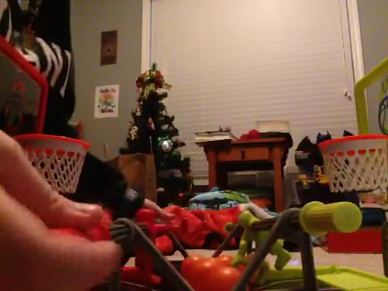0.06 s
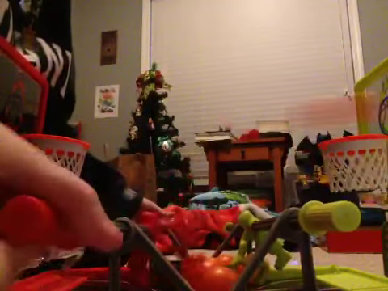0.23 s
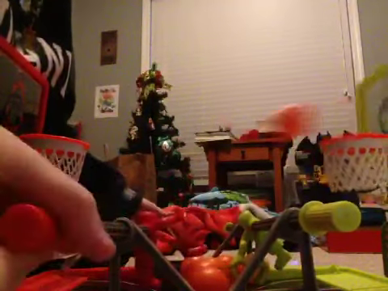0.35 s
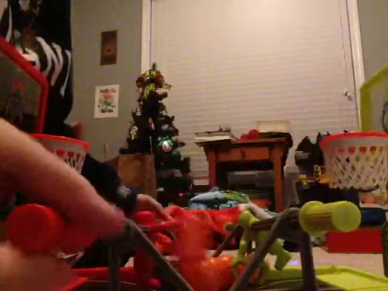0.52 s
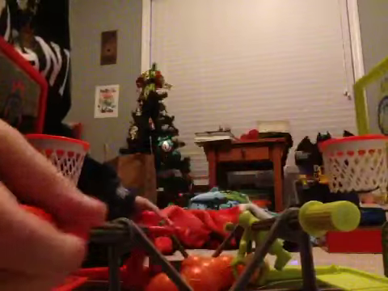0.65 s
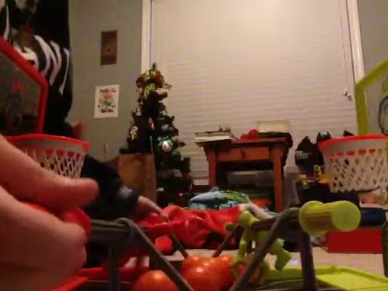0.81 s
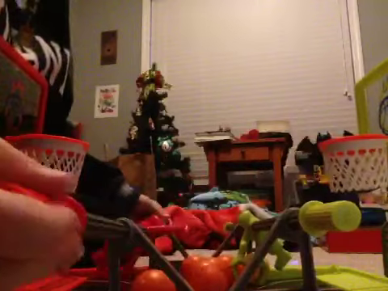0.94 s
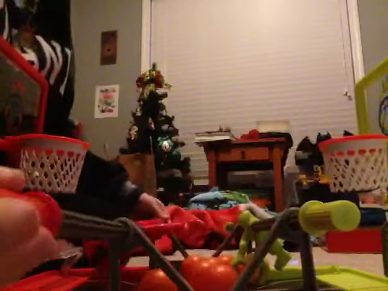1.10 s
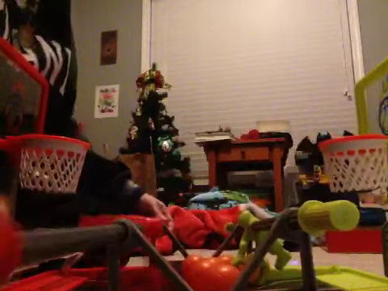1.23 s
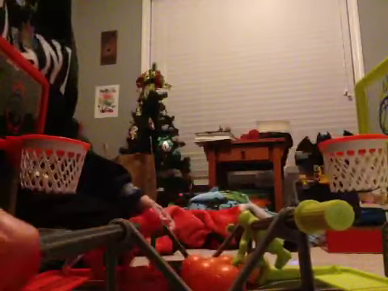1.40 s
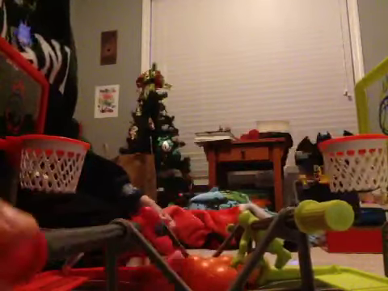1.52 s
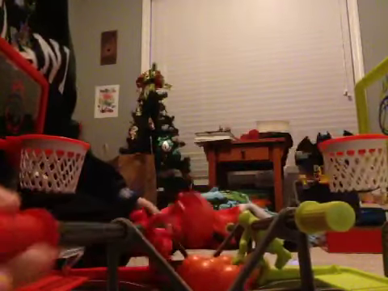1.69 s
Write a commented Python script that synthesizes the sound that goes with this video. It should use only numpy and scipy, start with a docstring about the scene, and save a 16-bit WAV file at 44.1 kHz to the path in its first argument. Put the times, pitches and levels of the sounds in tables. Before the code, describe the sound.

Plastic levers and rods of a tabletop game clack and knock in a quiet room.

```python
"""A quiet living room, with a plastic tabletop basketball game played close by.
Levers click and ping; a rod twice slams against its stop, ringing the frame; the hardest blows jolt the
microphone with a low thump. A small hollow ball bounces with a shell tick and a body tock. Between blows
the rod scrapes and a hand bumps the frame. Ceiling and walls answer every clack, over a faint hush."""
import sys
import numpy as np
from scipy import signal
from scipy.fft import rfft, irfft
from scipy.io import wavfile

SR = 44100
rng = np.random.default_rng(int(sys.argv[2]) if len(sys.argv) > 2 else 0)


def waveform_to_disk(signal):
    """Save audio, clipped to [-1, 1], as 16-bit WAV at the path in sys.argv[1]."""
    frames = np.transpose(np.atleast_2d(signal))
    scaled = np.clip(frames, -1, 1) * 32767
    samples = np.round(scaled).astype(np.int16)
    wavfile.write(sys.argv[1], SR, samples)


N = 77175
T = np.arange(N) / SR


def amp(db):
    """Decibels to gain."""
    return 10 ** (np.asarray(db) / 20)


def unit(x):
    """Scale to unit energy."""
    return x / np.sqrt(np.sum(x ** 2) + 1e-30)


def lookup(hz, points, column=1):
    """Interpolate a table column along log frequency."""
    table = np.array(points, float)
    return np.interp(np.log(np.maximum(hz, 1)), np.log(table[:, 0]), table[:, column])


def colour(x, points, size=4096):
    """Minimum-phase filter through (frequency [Hz], gain [dB]) points."""
    cepstrum = irfft(np.log(amp(lookup(np.fft.rfftfreq(size, 1 / SR), points))))
    cepstrum[1:size // 2] *= 2
    cepstrum[size // 2 + 1:] = 0
    return signal.fftconvolve(x, irfft(np.exp(rfft(cepstrum))))[:len(x)]


def shaped(noise, eq):
    """Coloured noise at unit RMS."""
    return unit(colour(noise, eq)) * np.sqrt(N)


def contour(points):
    """Gain curve through (time [s], level [dB]) points."""
    return amp(np.interp(T, *np.array(points).T))


def fade(t60_s, size):
    """Exponential decay."""
    return np.exp(-np.log(1000) * T[:size] / max(t60_s, 1e-3))


def dense_modes(envelope, size):
    """Countless close modes as flat-spectrum noise, each band under envelope(centre_hz)."""
    edges_hz = np.r_[20, 140, 280, 450, 700, 1000, np.geomspace(1400, 17000, 13)]
    spectrum, hz = rfft(rng.standard_normal(size)), np.fft.rfftfreq(size, 1 / SR)
    out = 0
    for lo, hi in zip(edges_hz[:-1], edges_hz[1:]):
        band = irfft(spectrum * (hz >= lo) * (hz < hi), size)
        out += unit(band * envelope(np.sqrt(lo * hi))) * np.sqrt(2 * (hi - lo) / SR)
    return out


def contact(t60_s, size=8192):
    """A hit on plastic: a snap, then a dense ring; t60_s holds at 5 kHz, lower bands ring longer."""
    snap_db, snap_s, bass_exponent = -17, 0.0012, 0.22
    snap = 2 * amp(snap_db) * np.exp(-T[:size] / snap_s)
    return dense_modes(lambda hz: fade(t60_s * (5000 / hz) ** bass_exponent, size) + snap, size)


def ring(modes, size=8192):
    """Struck modes of alternating sign: (frequency [Hz], resonance peak [dB], t60 [s])."""
    out = 0
    for k, (hz, db, t60_s) in enumerate(modes):
        decay = fade(t60_s, size)
        out += (-1) ** k * 2 * amp(db) * decay / decay.sum() * np.cos(2 * np.pi * hz * T[:size])
    return out


def add(bus, time_s, x, send_db=0):
    """Mix x into a bus: row 0 direct, row 1 room send."""
    start = int(time_s * SR)
    bus[:, start:start + len(x)] += np.outer([1, amp(send_db)], x[:N - start])


# Background spectrum (frequency [Hz], gain [dB])
HUSH_EQ = [(18, -64), (30, -28), (85, -47), (123, -11), (173, -16.5), (213, -5), (359, -13.5), (591, -25.5),
           (970, -27), (1140, -27.5), (1290, -33), (1440, -33), (15500, -30)]


def hush(rms_db=-63.5):
    """Faint steady room noise."""
    return shaped(rng.standard_normal(N), HUSH_EQ) * amp(rms_db)


# Diffuse tail (frequency [Hz], gain [dB], t60 [s])
ROOM_TAIL = [(116.3, -7.5, 0.58), (260, -8.5, 0.26), (715, -12.5, 0.34), (1550, -5.5, 0.22),
             (3970, -4.5, 0.29), (9200, -6, 0.3), (13300, -4.5, 0.17)]
# First reflections (delay [s], level [dB])
REFLECTIONS = [(.0157, -8.5), (.0240, -14), (.029, -12)]
# Reflection spectrum (frequency [Hz], gain [dB])
REFLECTION_EQ = [(300, -7), (2000, -4), (7000, -1.5)]


def room(send, size=24000):
    """Bright ceiling and wall reflections, scattered by furniture, and a short diffuse tail."""
    delay_s, build_s, scatter_t60_s = 0.0038, 0.0074, 0.0062
    build = 1 - np.exp(-np.maximum(T[:size] - delay_s, 0) / build_s)
    tail = dense_modes(lambda hz: build * fade(lookup(hz, ROOM_TAIL, column=2), size), size)
    response = colour(tail, ROOM_TAIL)
    for time_s, db in REFLECTIONS:
        scatter = dense_modes(lambda hz: fade(scatter_t60_s, 2048), 2048)
        start = int(time_s * SR)
        response[start:start + len(scatter)] += amp(db) * colour(scatter, REFLECTION_EQ)
    return signal.fftconvolve(send, response)[:N]


# Rod sliding in its bearing (time [s], level [dB])
SLIDE_LEVEL = [(.93, -84), (.97, -67.5), (1.1, -67), (1.16, -82)]
# Slide spectrum (frequency [Hz], gain [dB])
SLIDE_EQ = [(500, -26), (1400, -6.5), (1900, -2), (2550, -2), (3300, -10), (8000, -18)]


def rod_slide():
    """A faint, grainy rub as the rod is drawn back."""
    grain = rng.standard_normal(N) * amp(np.minimum(3 * rng.exponential(size=N), 20))
    return shaped(grain, SLIDE_EQ) * contour(SLIDE_LEVEL)


# Rod friction (time [s], level [dB])
SCRAPE_LEVEL = [(0, -76), (.17, -74.5), (.205, -58.5), (.243, -45), (.262, -41), (.29, -53), (.85, -65),
                (.98, -67.5), (1.11, -66), (1.21, -69.5), (1.275, -54.5), (1.33, -59), (1.58, -72.5),
                (1.62, -66), (1.75, -66)]
# Scrape spectrum (frequency [Hz], gain [dB])
SCRAPE_EQ = [(60, -12), (200, 5.5), (550, 3.5), (1200, -1), (2500, -6), (4500, -13), (15000, -18.5)]


def rod_scrape():
    """The rod scrapes in tiny catches."""
    bus = np.zeros((2, N))
    catches = rng.standard_normal(N) * amp(5.4 * rng.exponential(size=N))
    add(bus, 0, shaped(np.clip(catches, -40, 40), SCRAPE_EQ) * contour(SCRAPE_LEVEL))
    return bus


# Hand on the frame (time [s], level [dB])
HAND_BUMPS = [(0.887, -11.5), (.905, -20), (0.964, -13.5), (1.028, -27.5), (1.593, -31), (1.61, -24)]
# Bump spectrum (frequency [Hz], gain [dB])
BUMP_EQ = [(50, -28.5), (110, -10.5), (170, 15.5), (260, 1), (450, 2.5), (800, -30), (3000, -35)]


def hand_bumps():
    """A soft hand draws a low, dull ring from the frame."""
    bus = np.zeros((2, N))
    for time_s, db in HAND_BUMPS:
        add(bus, time_s, amp(db) * colour(contact(t60_s=0.14), BUMP_EQ))
    return bus


# Jolts to the microphone (time [s], level [dB])
LOW_THUMPS = [(0.3236, 9.5), (0.6444, -3), (0.7115, -10)]
# Thump spectrum (frequency [Hz], gain [dB])
THUMP_EQ = [(25, -7), (70, -7), (110, -1.5), (180, 0.5), (260, 13.5), (500, -10.5), (1200, -16.5)]


def low_thumps():
    """The hardest blows jolt the microphone, one low pulse each; no room send."""
    bus = np.zeros((2, N))
    pulse = colour(signal.unit_impulse(4096), THUMP_EQ)
    for time_s, db in LOW_THUMPS:
        add(bus, time_s, amp(db) * pulse)
    return bus[0]


# Ball landings (time [s], level [dB], treble [dB], hollow-body pitch [Hz])
BALL_BOUNCES = [(.5271, 0.5, 1, 697), (.5703, -9, -5.5, 722), (.8542, -24.5, -25, 774),
                (1.4524, -18, -13, 643)]
# Shell contact spectrum (frequency [Hz], gain [dB])
SHELL_EQ = [(40, -21), (250, -0.5), (600, 6.5), (1500, -3.5), (3500, -6), (8800, -2.5), (10500, 7),
            (13000, 12), (15000, 0)]
# Shell modes (frequency [Hz], peak [dB], t60 [s])
SHELL_MODES = [(1243, 11.5, 0.049), (1580, 6.5, 0.013), (2637, 2.5, 0.023), (10250, 16.5, 0.029),
               (13100, -5, 0.023)]


def ball_bounces(hollow_db=18.5, hollow_t60_s=0.039):
    """The ball's shell ticks and its hollow body tocks; softer bounces are duller."""
    bus = np.zeros((2, N))
    for time_s, db, treble_db, hollow_hz in BALL_BOUNCES:
        shell = colour(contact(t60_s=0.029), SHELL_EQ) + ring(SHELL_MODES)
        tick = colour(shell, [(3000, 0.013), (12000, treble_db)])
        tock = colour(ring([(hollow_hz, 0, hollow_t60_s)]), [(900, 0.5), (4000, -26)])
        add(bus, time_s, amp(db) * tick, send_db=-2.5)
        add(bus, time_s, amp(db + hollow_db) * tock, send_db=-12)
    return bus


# Per-click EQ points (frequency [Hz])
CLICK_BANDS_HZ = (250, 600, 1500, 2800, 3800, 7000, 12000)
# Lever clicks (time [s], t60 [s], 7 gains at CLICK_BANDS_HZ [dB], ping [dB], room send [dB],
# resonance [Hz], resonance peak [dB])
LEVER_CLICKS = [(.2002, 0.018, -18, -29, -19, -22, -37, -43, -37, -40, -7, 2436, -19),
                (0.2208, 0.039, -21.5, -15, -18, -27, -36, -26, -18.5, -19, -4, 1040, -15),
                (0.2487, 0.017, -2, 9, 10, 3, -1.5, 7.5, 1.5, -6.5, -3.5, 5070, 9.5),
                (0.3743, 0.045, -1, 2.5, 11, 5.5, -16, -9, 2, -10, -0.5, 308.5, 12.5),
                (0.7123, 0.012, 6, 6.5, 16, 5.5, -5, -13.5, -1.5, 8, -5.5, 2733, 12),
                (1.2822, 0.046, 13, 9.5, 6, 0, -10, -4, 7, 12, 2.5, 5000, 8),
                (1.3238, 0.023, 16, 8.5, 16, -28, -13, -18, -28, 14, -1.5, 433, 13),
                (1.3256, 0.024, 5, 12.5, 11, 5, 2.5, 1, 12, -4, -1.5, 1529, 16.5),
                (1.6473, 0.0061, -14.5, -6, -25, -25, -36, -43, -49.5, -40, 12, 885, -15),
                (1.661, 0.019, 0.5, -3, -6, -26.5, -18.5, -18.5, -5.5, -2, -3.5, 1630, -3),
                (1.7128, 0.024, -3.5, -16, -15, -37, -45, -49, -43, -40, -20, 1560, -14)]
# Spectrum common to all clicks (frequency [Hz], gain [dB])
CLICK_EQ = [(30, -48), (100, -25.5), (200, -2), (320, -2.5), (1600, -5.5), (2500, -5.5), (4000, 0),
            (5200, 2.5), (10500, 2.5), (15000, -3.5)]
# Lever ping modes (frequency [Hz], peak [dB], t60 [s])
PING_MODES = [(8230, 1, .028), (8460, 1, .034), (10207, -3, .025), (10505, -3, .025)]


def lever_clicks(body_t60_s=0.0093):
    """Sharp plastic contacts, each with its own colour, one main resonance and a thin ping."""
    bus = np.zeros((2, N))
    for time_s, t60_s, *bands_db, ping_db, send_db, body_hz, body_db in LEVER_CLICKS:
        click = colour(contact(t60_s), CLICK_EQ)
        click = colour(click, list(zip(CLICK_BANDS_HZ, bands_db)))
        body = ring([(body_hz, body_db, body_t60_s)])
        body = colour(body, [(body_hz / 2, -12), (body_hz, 0), (2 * body_hz, -12)])
        add(bus, time_s, click + body + amp(ping_db) * ring(PING_MODES), send_db)
    return bus


# Rod on its stop, two hits per slam (time [s], level [dB], bass [dB], mids [dB], treble [dB], t60 [s])
STOP_HITS = [(0.3222, 11.5, 2.5, -4, -0.5, 0.037), (0.3276, 9, -5, -9, -4, 0.026),
             (.6437, 13, -6.5, -11.5, -13, 0.031), (0.6574, 11, -8, -12.5, -19.5, 0.047)]
# Stop contact spectrum (frequency [Hz], gain [dB])
STOP_EQ = [(30, -14.5), (100, -12.5), (190, 5), (440, 7.5), (800, 1.5), (1700, 5), (2800, -2), (3800, 0),
           (5500, -2.5), (9000, -3), (14000, -0.5)]
# Frame modes (frequency [Hz], peak [dB], t60 [s])
FRAME_MODES = [(179, 8.5, 0.064), (252.6, 16.5, 0.089), (283, 9.5, 0.35), (375, 10.5, 0.069),
               (416, 12.5, 0.056), (497, 4.5, 0.065), (667, 2.5, 0.051), (947, 5.5, 0.023),
               (1196, 7.5, 0.034), (1493, 3, 0.017), (2128, 10, 0.033), (3567, 5.5, 0.057),
               (3885, -2, 0.027)]


def rod_slams():
    """The rod hits its stop and the whole frame rings."""
    bus = np.zeros((2, N))
    for time_s, db, bass_db, mids_db, treble_db, t60_s in STOP_HITS:
        blow = colour(contact(t60_s), STOP_EQ) + ring(FRAME_MODES)
        hit_eq = [(280, bass_db), (520, 0.012), (1700, mids_db), (3600, treble_db)]
        add(bus, time_s, amp(db) * colour(blow, hit_eq), send_db=-0.5)
    return bus


def scene():
    """The game in the room, thin in the deep bass, over the hush; mono."""
    background = hush()
    game = rod_slams() + lever_clicks() + ball_bounces() + rod_scrape() + hand_bumps()
    low_cut = signal.butter(1, 95, "high", fs=SR, output="sos")
    direct, send = signal.sosfilt(low_cut, game)
    return (background + room(send) + rod_slide() + low_thumps() + direct)[None]


def record(dry):
    """Steep low-pass on the top treble."""
    cutoff_hz = 15250
    return signal.sosfilt(signal.ellip(8, .2, 70, cutoff_hz, fs=SR, output="sos"), dry)


dry = scene()
out = record(dry)
waveform_to_disk(out)
```